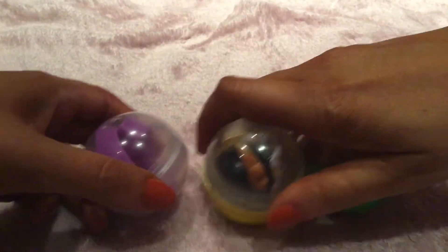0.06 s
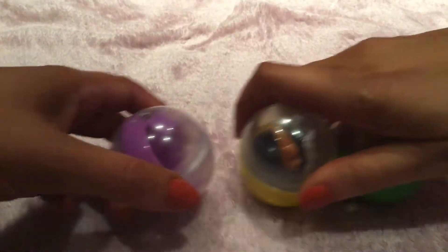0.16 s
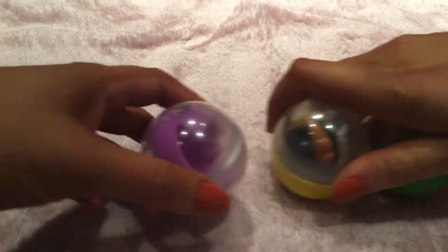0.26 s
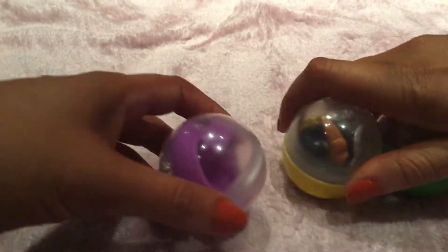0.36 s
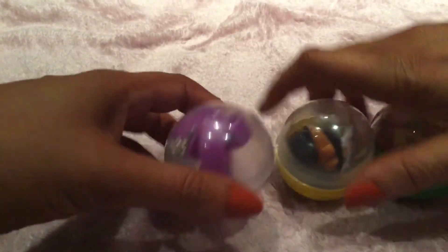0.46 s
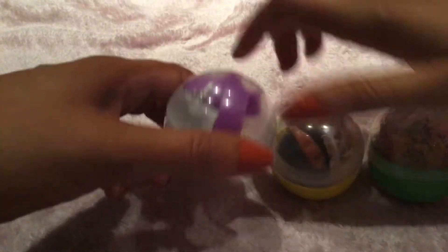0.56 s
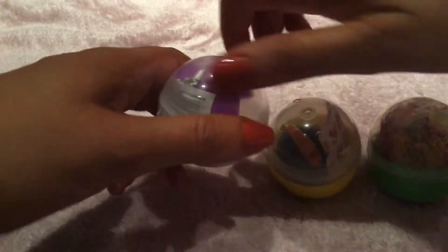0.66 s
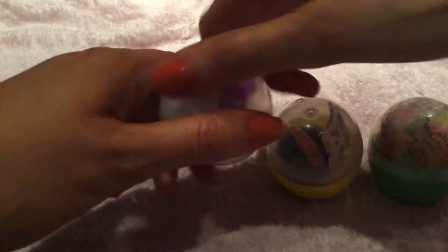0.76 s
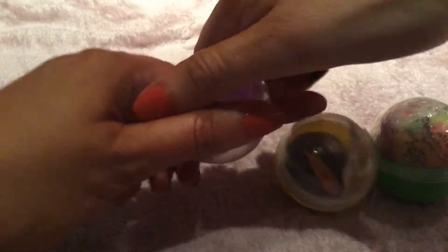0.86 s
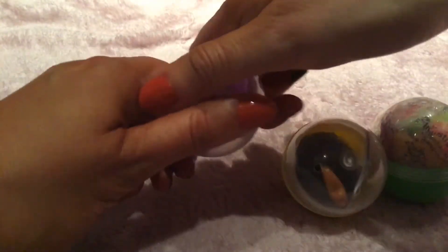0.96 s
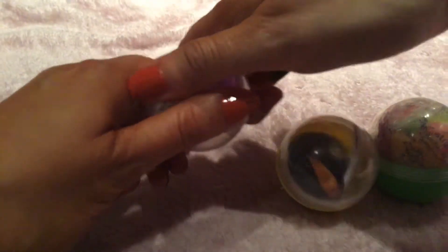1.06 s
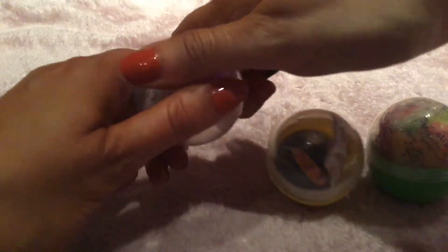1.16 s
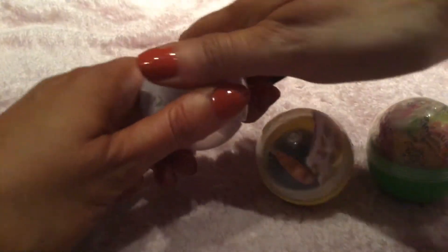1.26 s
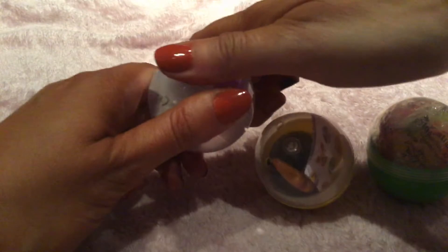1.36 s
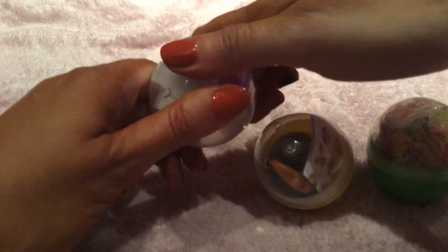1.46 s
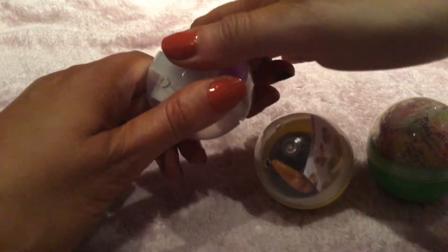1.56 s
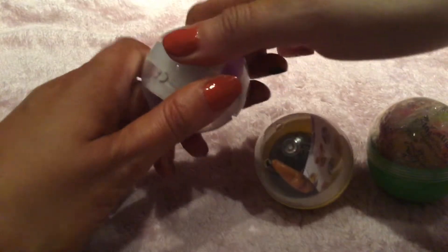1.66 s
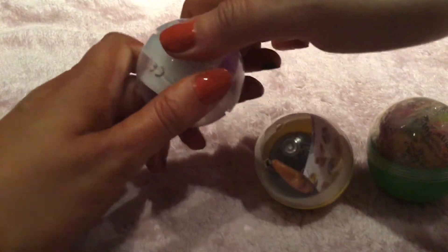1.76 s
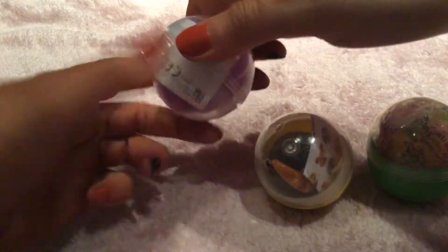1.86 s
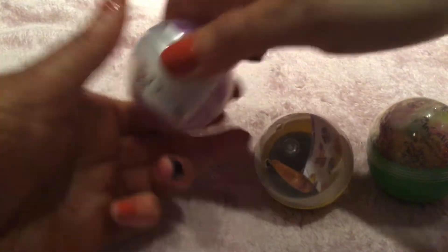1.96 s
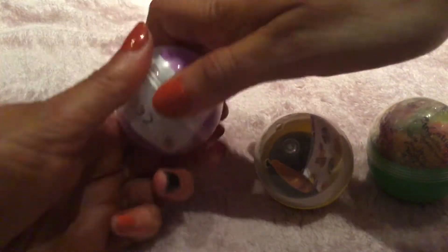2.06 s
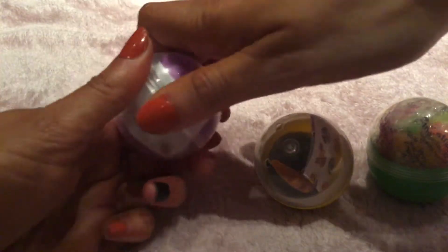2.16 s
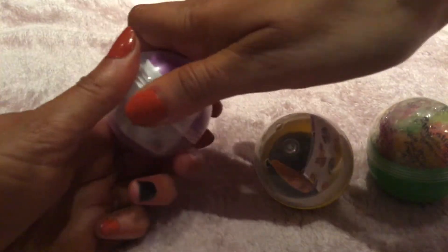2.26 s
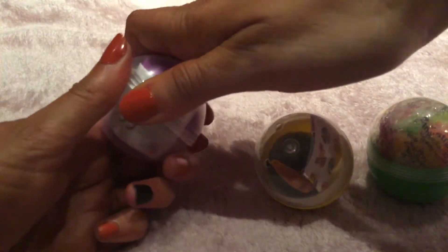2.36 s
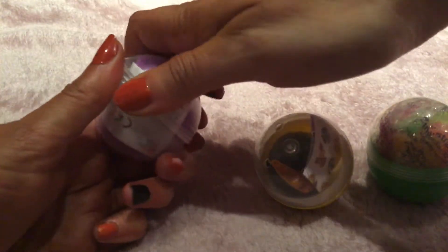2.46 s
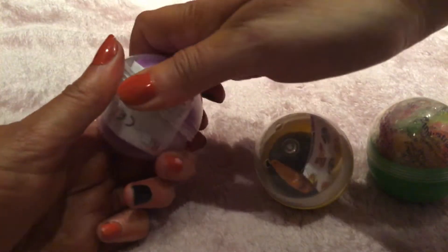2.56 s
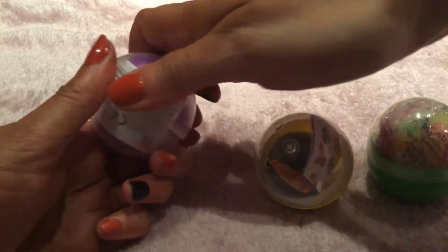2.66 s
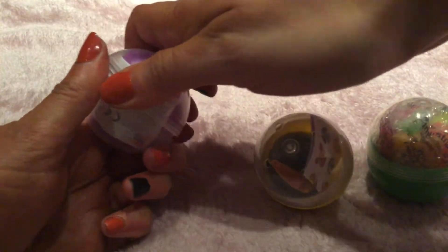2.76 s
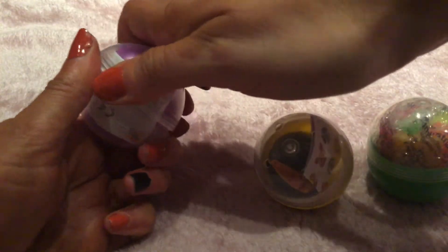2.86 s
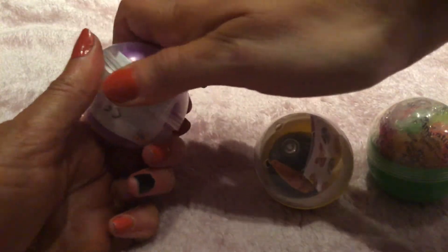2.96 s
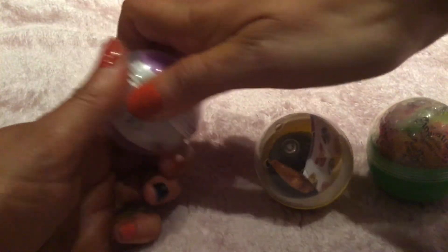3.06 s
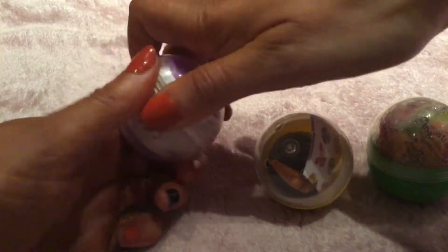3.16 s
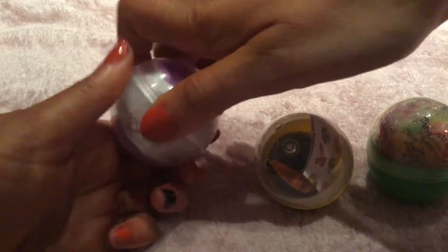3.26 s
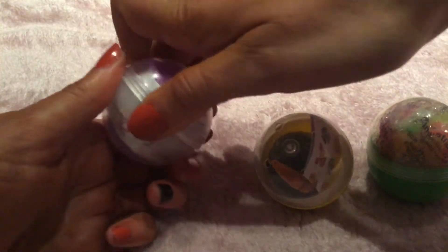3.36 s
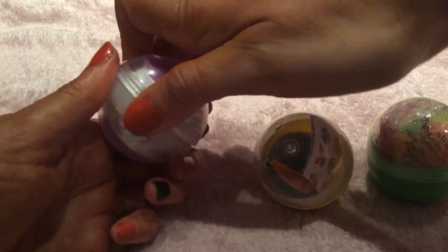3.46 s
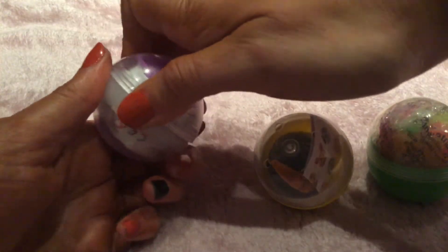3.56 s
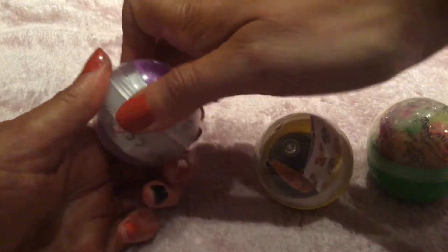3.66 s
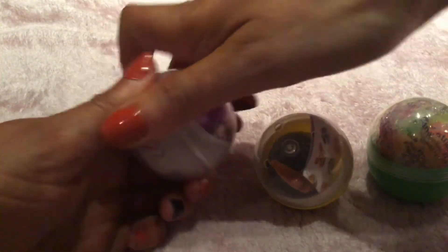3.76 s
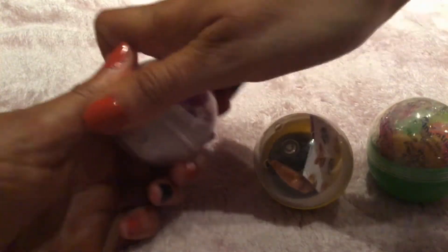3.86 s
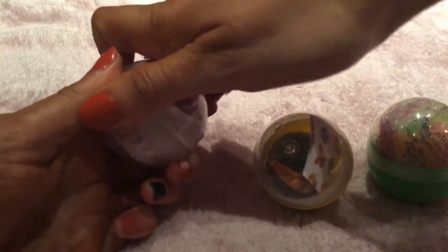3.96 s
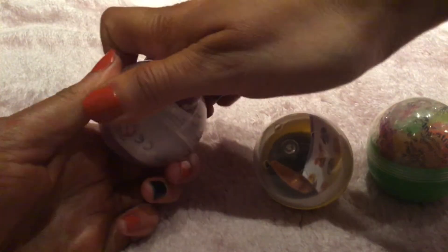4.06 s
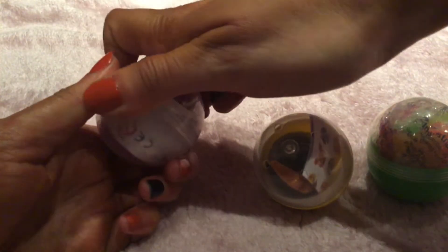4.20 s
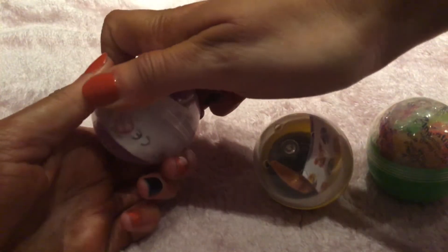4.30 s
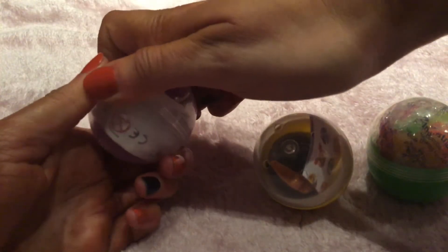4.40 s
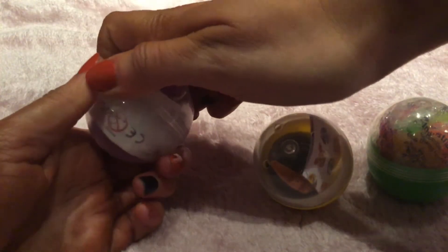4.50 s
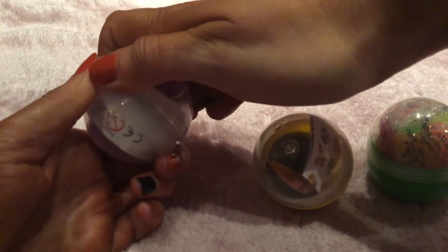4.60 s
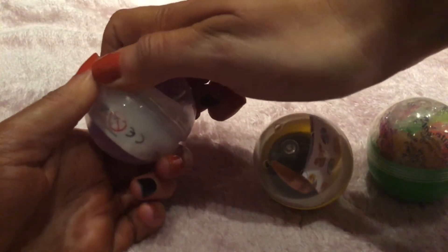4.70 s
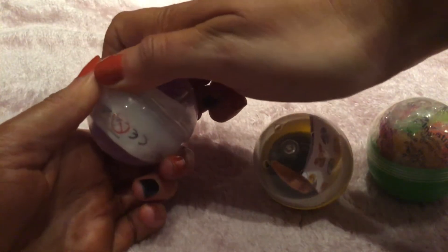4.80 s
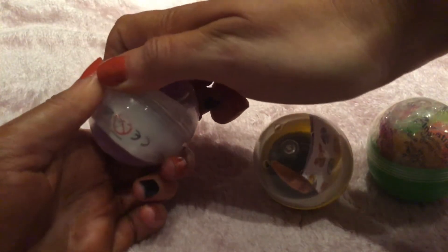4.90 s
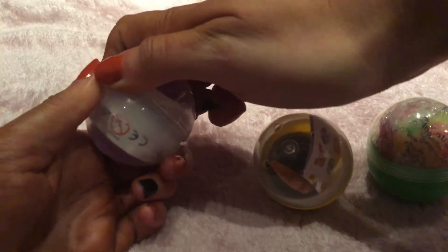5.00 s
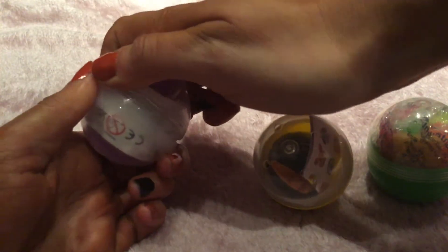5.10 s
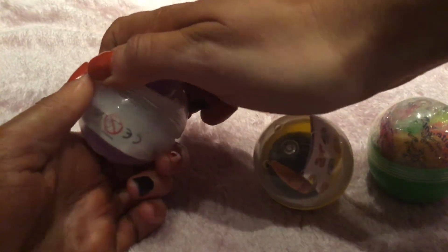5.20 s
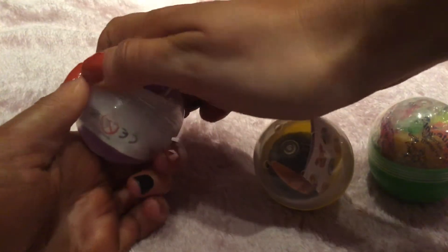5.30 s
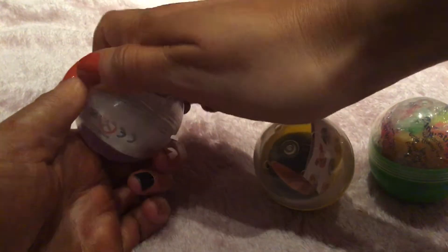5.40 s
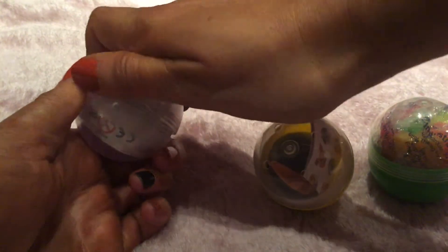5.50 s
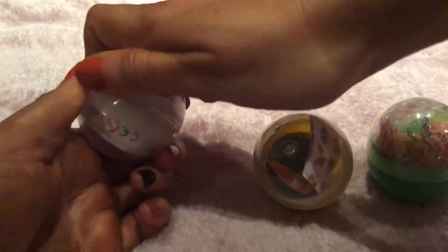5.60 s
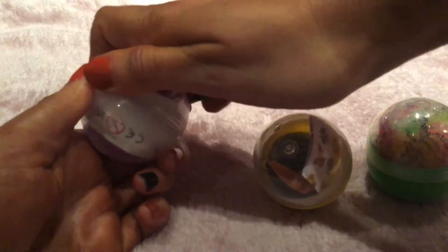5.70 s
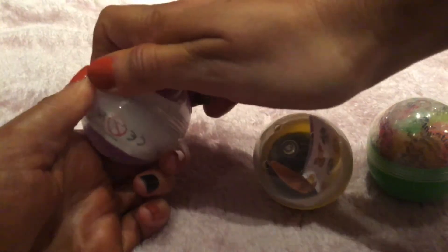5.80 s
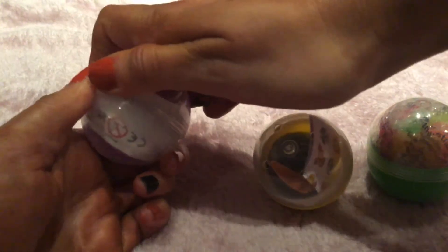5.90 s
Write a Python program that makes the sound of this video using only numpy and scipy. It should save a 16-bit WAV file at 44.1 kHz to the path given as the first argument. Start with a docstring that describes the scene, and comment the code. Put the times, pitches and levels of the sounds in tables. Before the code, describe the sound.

Hard plastic toy capsule handled and pried at, with faint nail ticks, a quick double snap, then one loud sharp crack and a weaker one.

```python
"""A hard plastic toy capsule is pried open: its rim sticks, then slips over its catch with a few sharp snaps.
Each snap is a jolt exciting damped shell modes, with a chirped thump from the wall and a brief knock.
Around the snaps, short filtered clicks are nails ticking, hollow resonances are fingertips bumping,
grainy shaped noise is skin sliding, and dense jolts are the rim creaking and settling.
A short, diffuse reverberation follows, above coloured-noise room rumble, hiss and a faint motor hum."""
import sys
import numpy as np
from scipy import signal
from scipy.fft import rfft, irfft, next_fast_len
from scipy.io import wavfile
from scipy.ndimage import uniform_filter1d

SR = 44100
rng = np.random.default_rng(int(sys.argv[2]) if len(sys.argv) > 2 else 0)


def unload_audio(sound):
    """Save the sound as a 16-bit wav file, at the path given as the first command line argument."""
    columns = np.transpose(np.atleast_2d(sound))
    # keep every value between -1 and 1, then stretch to whole-number steps
    steps = np.round(np.clip(columns, -1, 1) * 32767)
    wavfile.write(sys.argv[1], SR, steps.astype(np.int16))


N = 262130
HIT_SIZE, LEAD_S = 4096, 0.012  # samples in one hit, and the time of contact inside it

# Slips of the rim over its catch: t/s, crack level/dB, slip time constant/ms, slip level re jolt/dB,
# spectral tilt/(dB per octave), first freed f/Hz, its boost/dB, second freed f/Hz, its boost/dB,
# muted f/Hz, crack cutoff f/Hz, knock level/dB, thump level/dB, initial thump f/Hz, thump decay/ms
RIM_SLIPS = [(1.1324, -32.5, .28, -9, -6, 2230, 9, 4200, 7.5, 7000, 12000, -46, -31, 900, 6),
             (1.1459, -18.5, .4, -8, -0.5, 2050, 14.5, 3820, 7, 2994, 12500, -21.5, -15.5, 766, 4.5),
             (1.1561, -35.5, .48, -2, -3, 2760, 10, 1700, 7, 4500, 14000, -40, -32, 594, 3.7),
             (1.1708, -21, 1.06, 3.5, 0.5, 3100, 9, 4310, 7, 3650, 11500, -27, -13.5, 690, 4.5),
             (3.7773, -11, 0.55, -3, -1, 4390, 9.5, 1694, 7, 3100, 12440, -11.5, -8.5, 774, 2.9),
             (4.6106, -24, 0.96, 0.5, -3.5, 2800, 5.5, 7050, 2.5, 2010, 12100, -29, -16.5, 684, 5.2)]


def snaps(low_hz=1450, bare_share=0.3, freed_oct=0.22, muted_oct=0.1, muted_db=-9):
    """Stick-slip release: the rim scrapes up its catch, then one jolt excites the shell and its wall."""
    out = np.zeros(N)
    jolt = signal.unit_impulse(HIT_SIZE, int(LEAD_S * SR))
    for (s, crack_db, slip_ms, slip_db, tilt_db, first_hz, first_db, second_hz, second_db, muted_hz,
         edge_hz, knock_db, thump_db, thump_hz, decay_ms) in RIM_SLIPS:
        force = strength(jolt, 0) + strength(slip(slip_ms), slip_db)
        ring = shell(force, direct=bare_share)

        # The fingers' grip frees two resonances and mutes a third.
        grip_db = first_db * bell(ring, first_hz, freed_oct)
        grip_db += second_db * bell(ring, second_hz, freed_oct)
        grip_db += muted_db * bell(ring, muted_hz, muted_oct)
        slope_db = tilt_db * octaves(ring).clip(10)  # tilted above 1024 Hz only
        ring = irfft(rfft(ring) * undb(slope_db + grip_db))

        ring = butter(ring, edge_hz, "low", order=3)
        crack = disperse(butter(ring, low_hz, "high", order=5))
        spring = thump(thump_hz, decay_ms)
        air = spring + hollow(spring)
        hit = strength(crack, crack_db) + strength(knock(), knock_db) + strength(air, thump_db)
        add(out, hit, s)
    return out


def slip(ms, grain_db=4, release=1.0):
    """Stick-slip friction: tiny random jolts build up and die away; release scales the dying time."""
    t_ms = 1000 * (np.arange(HIT_SIZE) / SR - LEAD_S)
    grains = rng.standard_normal(HIT_SIZE) * undb(grain_db * rng.standard_normal(HIT_SIZE))
    return grains * np.exp(-np.maximum(-t_ms, t_ms / release) / max(ms, 0.1))


# Modes of the hand-damped shell: f/Hz, bandwidth/Hz, level/dB before the random spread
SHELL_MODES = [(1062, 530, 4.5), (1730, 840, -2), (2090, 350, 2), (2530, 330, -3.5), (3100, 420, -3.5),
               (3780, 700, 1.5), (4290, 240, -2), (4650, 210, -5), (5500, 300, -2.5), (5916, 200, -2.5),
               (6920, 240, -11), (8070, 350, -8), (10540, 450, -5), (11320, 600, 0.5), (11900, 500, -7)]


def shell(force, direct=0.3, spread_db=1):
    """Modal superposition: parallel resonances, weighted anew for each contact, plus the bare crack."""
    out = direct * butter(force, 1200, "high")
    for (hz, width_hz, db), chance in zip(SHELL_MODES, rng.standard_normal(len(SHELL_MODES))):
        out = out + undb(db + spread_db * chance) * resonate(force, hz, width_hz)
    return out


def disperse(x, lag_s=0.00017, mid_hz=4000):
    """Bending-wave dispersion: treble outruns bass, smearing a crack into a tiny downward chirp."""
    hz = np.fft.rfftfreq(len(x), 1 / SR)
    # The group delay is lag_s * (sqrt(mid_hz / hz) - 1).
    delay_cycles = lag_s * (2 * np.sqrt(mid_hz * hz) - hz)
    return irfft(rfft(x) * np.exp(-2j * np.pi * delay_cycles))


def thump(hz, decay_ms, cycles=0.77, lag_s=0.00029, top_hz=1000, low_hz=105):
    """Dispersive recoil: slower low-pitched bending waves draw the wall's swing into ever longer lobes."""
    t = np.maximum(np.arange(HIT_SIZE) / SR - LEAD_S - lag_s, 0)
    phase = 2 * np.pi * cycles * np.log1p(t * hz / cycles)  # starts at hz, then falls
    swing = -np.sin(phase) * np.exp(-1000 * t / max(decay_ms, 0.5))
    return butter(butter(swing, top_hz, "low"), low_hz, "high")


# Air in the capsule and the cupped hands: f/Hz, bandwidth/Hz, level re thump/dB
AIR_MODES = [(293, 31, -9), (650, 22, -11)]


def hollow(x):
    """Cavity resonance: the enclosed air rings on at low pitch after a thump."""
    return sum(undb(db) * resonate(x, hz, width_hz) for hz, width_hz, db in AIR_MODES)


def knock(hz=900, length_ms=0.68, lag_s=0.00079):
    """Damped bending mode: the palm confines the dome's lowest mode to a brief Gaussian burst."""
    t = np.arange(HIT_SIZE) / SR - LEAD_S - lag_s
    return -np.cos(2 * np.pi * hz * t) * np.exp(-(1000 * t / length_ms) ** 2 / 2)


def settling(per_s=1400, level_db=-33.5, fade_s=0.025, spread_db=5, rise_s=0.0042, edge_hz=7000):
    """Creep under strain: a dense crackle swells and fades about each snap, in proportion to its crack."""
    strain = sum(undb(crack_db + level_db) * swell(s, rise_s, fade_s) for s, crack_db, *_ in RIM_SLIPS)
    crackle = shell(jolts(per_s, spread_db), direct=1.0)
    return unit(butter(crackle, edge_hz, "low")) * strain


# The strained rim drags: t of letting go/s, shell level/dB, build-up time constant/s
RIM_DRAGS = [(1.116, -51, 0.004), (4.699, -57, 0.028), (5.53, -65, 0.013)]


def creaks(per_s=3000, spread_db=5, stop_s=0.0025, edge_hz=4200, body_db=-7, body_hz=900,
           rim_hz=3850, rim_width_hz=350, rim_db=0):
    """Stick-slip creak: dense jolts swell as the rim drags and sings, then stop when it lets go."""
    force = jolts(per_s, spread_db)
    rim = undb(rim_db) * resonate(force, rim_hz, rim_width_hz)
    ring = butter(shell(force, direct=0.12) + rim, edge_hz, "low", order=6)
    body = butter(butter(force, body_hz, "low"), 440, "high")
    drag = sum(undb(db) * swell(s, rise_s, stop_s) for s, db, rise_s in RIM_DRAGS)
    return (unit(ring) + undb(body_db) * unit(body)) * drag


def jolts(per_s, spread_db):
    """Poisson-like excitation: separate jolts of random sign and uneven size at random moments."""
    present = rng.random(N) < per_s / SR
    sign = np.sign(rng.standard_normal(N))
    return present * sign * undb(spread_db * rng.uniform(-0.81, 1, N))


# Nails and the loose rim on the shell: t/s, ring level/dB, knock level re ring/dB,
# centre of emphasis f/Hz, build-up time constant/ms
CONTACTS = [(.804, -59, 3, 11500, 1.2), (0.8512, -52, -13, 4650, 0.5), (0.902, -63, 5, 1500, 1.7),
            (0.9935, -58, -6, 3850, 0.9), (1.341, -56.5, -11, 3300, .6), (1.357, -49.5, -5, 3500, 8.8),
            (1.454, -57.5, -21, 5140, 0.91), (1.599, -60.5, -17, 10800, .8), (1.677, -58, -16, 4970, 0.86),
            (1.703, -62, -6, 6400, .8), (1.747, -53.5, -20, 8160, 1.6), (1.793, -61.5, -20, 5700, 1.4),
            (1.863, -51, -2.5, 3500, 5), (1.896, -48, 0, 3980, 2.8), (2.033, -57, -27, 11400, 0.46),
            (2.048, -52.5, -20, 5600, 2), (2.0577, -41.5, -26, 11900, 0.92),
            (2.0615, -48, -26, 12500, 0.63), (2.066, -48.5, -16, 8500, 1.3),
            (2.1135, -50.5, -28, 10200, 0.47), (2.1168, -46.5, -28, 8700, .8),
            (2.164, -56.5, -12, 12000, 1.2), (2.169, -58, -7, 3500, 3.5), (3.260, -44.5, 3.5, 5200, 1.35),
            (3.388, -62, -13, 5000, 1.2), (3.510, -49, -11, 7000, 0.29), (3.743, -54, -4.5, 3060, 1.2),
            (3.781, -29.5, -7, 6000, 1.3), (3.7943, -35, -7, 7540, .9), (3.805, -47, -8.5, 11100, 0.99),
            (3.8135, -39.5, -5.5, 10500, 1), (3.8285, -43.5, -6.5, 8500, 0.8),
            (3.8332, -46, -13, 9100, 0.68), (3.8358, -39, -12, 7000, 2.8), (3.871, -56.5, -1, 4500, 1.1),
            (3.924, -53.5, -14.5, 4400, 1.8), (4.192, -53, -3, 2860, 1.4), (4.6147, -49, 5, 6500, 1.8),
            (4.628, -47, -1.5, 2500, 1.05), (4.667, -64, -10, 3700, 0.85), (4.676, -49, -1, 2290, 1.9),
            (4.692, -50.5, -8, 3100, 2.7), (4.696, -45.5, -17, 2880, 2.3), (4.757, -55.5, -1, 3600, 3),
            (4.826, -68, -8, 3800, 1.2), (5.529, -58.5, 7, 3000, 3.2), (5.595, -49.5, -7, 3330, 1.1)]


def ticks():
    """Light impact: nails and the loose rim touch the shell in brief contacts."""
    out = np.zeros(N)
    for s, db, knock_db, hz, ms in CONTACTS:
        add(out, tick(db, knock_db, hz, ms), s)
    return out


def tick(db, knock_db, hz, ms, width_oct=0.82, knock_hz=750, knock_low_hz=300, edge_hz=15000,
         low_share=0.3):
    """Contact stiffness: a harder touch favours higher modes; the flesh behind it adds a dull knock."""
    force = slip(ms, release=0.17)  # stops sooner than it builds up
    ring = butter(shell(force, direct=0.13), edge_hz, "low", order=3)
    ring = butter(ring, low_share * hz, "high", order=5)
    ring = irfft(rfft(ring) * bell(ring, hz, width_oct))
    dull = butter(butter(force, knock_hz, "low"), knock_low_hz, "high")
    return strength(ring, db) + strength(dull, db + knock_db)


# Fingertips on the closed capsule: t/s, level/dB, hollow resonance f/Hz, T60/s
FINGERTIP_BUMPS = [(0.903, -45, 764, 0.025), (.929, -54.5, 640, 0.021), (0.994, -52, 795, 0.027),
                   (2.169, -43.5, 393, 0.057), (3.261, -42, 375, 0.053), (3.26, -40, 88.5, 0.14),
                   (4.698, -44, 480, 0.013), (5.595, -48, 488, .018)]


def bumps(contact_ms=3.3, soft_hz=1100):
    """Soft impact: a long contact has little treble and wakes one low, hollow resonance."""
    out = np.zeros(N)
    for s, db, hz, t60 in FINGERTIP_BUMPS:
        width_hz = np.log(1000) / (np.pi * t60)
        push = butter(slip(contact_ms), soft_hz, "low", order=3)
        add(out, strength(resonate(push, hz, width_hz), db), s)
    return out


# Spectrum of sliding skin: f/Hz, relative density level/dB
SKIN_SPECTRUM = [(700, -8), (1500, -14), (3200, -11.5), (4500, 4.5), (6800, 0.5), (8600, -6.5), (10300, -2),
                 (11800, 2), (13300, -8), (16000, -16)]
# Finger strokes: t of firmest pressure/s, level/dB, swell time constant/s, fade time constant/s,
# spectral tilt/(dB per octave)
FINGER_STROKES = [(.475, -71.5, 0.012, 0.068, -1), (.672, -71.5, 0.008, 0.1, 2),
                  (.8, -66.5, 0.042, 0.057, 11.5), (0.855, -62.5, 0.023, 0.018, -2),
                  (1.26, -72, 0.02, 0.17, -4.5), (1.359, -65, 0.013, 0.015, 0),
                  (1.695, -73, 0.034, 0.025, 12), (1.852, -57, 0.012, 0.021, -3),
                  (1.885, -70, 0.012, 0.009, 5), (1.965, -70.5, 0.035, 0.05, 9),
                  (2.07, -72.5, 0.054, 0.11, -4), (2.88, -76, 0.17, 0.12, -14),
                  (3.15, -65.5, 0.052, 0.029, -1), (3.31, -66.5, 0.043, 0.029, -2.5),
                  (3.61, -72, 0.032, .03, -2), (3.97, -71.5, 0.043, 0.12, -4),
                  (4.47, -71.5, 0.035, 0.05, -14.5)]


def fingers(grain_db=4.5, flutter_db=1.5, ridge_db=1.5, body_db=-11):
    """Sliding friction: skin ridges catch and slip in a grainy hiss that also stirs the shell."""
    uneven_db = grain_db * rng.standard_normal(N) + flutter_db * walk(94) + ridge_db * walk(600)
    grains = rng.standard_normal(N) * undb(uneven_db)
    rub = unit(colour(grains, SKIN_SPECTRUM)) + undb(body_db) * unit(shell(grains, direct=0.16))
    rub = np.resize(rub, next_fast_len(N))
    spectrum = rfft(rub)
    height_oct = octaves(rub).clip(np.log2(3000))  # tilted above 3 kHz only
    out = np.zeros(N)
    for s, db, rise_s, fall_s, tilt_db in FINGER_STROKES:
        hiss = unit(irfft(spectrum * undb(tilt_db * height_oct))[:N])
        out += undb(db) * swell(s, rise_s, fall_s) * hiss
    return out


# Reverberation by band: centre f/Hz, level/dB, T60/s
REVERB_BANDS = [(177.6, -14, 0.24), (445, -18.5, 0.092), (900, -20, 0.15), (1650, -22, 0.15),
                (3036, -24, 0.27), (4877, -19.5, 0.17), (7600, -10.5, 0.06), (12080, -21, .18)]


def reverberation(x, gap_s=0.00093):
    """Diffuse decay: a small furnished room answers with noise bands that each fade exponentially."""
    t = np.arange(SR // 2) / SR
    centres = np.log2([row[0] for row in REVERB_BANDS])
    response = np.zeros(len(t))
    for (hz, db, t60), share in zip(REVERB_BANDS, np.eye(len(REVERB_BANDS))):
        weight = np.sqrt(np.interp(octaves(t), centres, share))  # crossfades neighbouring bands
        band = irfft(rfft(rng.standard_normal(len(t))) * weight, len(t))
        fade = np.exp(-np.log(1000) * t / t60) * (t > gap_s)
        response += undb(db) * band * fade / np.sqrt(np.sum(fade ** 2))
    return signal.fftconvolve(x, response)[:N]


# Room rumble and microphone hiss, before the low cut: f/Hz, relative density level/dB
ROOM_SPECTRUM = [(15, -42), (25, -14), (38, -8.5), (97, -7), (149, -6), (166, -6.5), (195, -4), (217, -7),
                 (335, -9.5), (400, -15.5), (480, -23), (714, -26), (911, -28.5), (2610, -35.3),
                 (5000, -38.3), (9000, -42.7), (11200, -40.5), (13000, -47.5), (16000, -59.5)]


def background(room_db=-58.5, wander_db=-0.5, low_hz=48, hum_hz=48.5, harmonics_db=(-73, -77, -81, -65.5),
               waver_db=2.0, drift=0.0037):
    """Stationary noise and harmonic hum: coloured rumble and hiss above a house motor's wavering tones."""
    rumble = butter(colour(rng.standard_normal(N), ROOM_SPECTRUM), low_hz, "high", order=5)
    turns = np.cumsum(hum_hz * (1 + drift * walk(1.9))) / SR
    hum = np.zeros(N)
    for number, db in enumerate(harmonics_db, start=1):
        tone = np.sqrt(2) * np.sin(2 * np.pi * number * turns)
        hum += tone * undb(db + waver_db * walk(3.6))
    return unit(rumble) * undb(room_db + wander_db * walk(2.1)) + hum


def undb(db):
    """Logarithmic level: convert decibels to amplitude gain."""
    return 10 ** (np.asarray(db) / 20)


def unit(x):
    """Normalisation: scale to an rms of one."""
    return x / np.sqrt(np.mean(x ** 2))


def strength(x, db):
    """Energy equivalence: give a click the energy of one millisecond at this rms level."""
    return x * undb(db) / np.sqrt(np.sum(x ** 2) / (SR / 1000))


def butter(x, hz, kind, order=2):
    """Maximally flat filtering: a causal low-pass or high-pass."""
    return signal.sosfilt(signal.butter(order, min(hz, SR / 2 - 100), kind, fs=SR, output="sos"), x)


def resonate(x, hz, width_hz):
    """Simple resonance: a second-order peak of the given bandwidth."""
    return signal.lfilter(*signal.iirpeak(hz, hz / width_hz, fs=SR), x)


def octaves(x):
    """Logarithmic pitch: the frequency of each spectral bin of x, in octaves above 1 Hz."""
    return np.log2(np.maximum(np.fft.rfftfreq(len(x), 1 / SR), 1))


def bell(x, hz, width_oct):
    """Resonance weighting: a bell over the spectrum of x, one at its centre."""
    return 1 / (1 + ((octaves(x) - np.log2(hz)) / width_oct) ** 2)


def colour(x, points):
    """Spectral shaping: interpolate levels between (f/Hz, level/dB) points on a logarithmic axis."""
    hz, db = np.transpose(points)
    return irfft(rfft(x) * undb(np.interp(octaves(x), np.log2(hz), db)), len(x))


def walk(rate):
    """Band-limited fluctuation: smoothed random steps, rate per second, with an rms of one."""
    k = int(SR / rate)
    steps = np.repeat(rng.standard_normal(N // k + 1), k)[:N]
    return unit(uniform_filter1d(steps, k))


def swell(s, rise_s, fall_s):
    """Exponential envelope: grows to one at s seconds and dies away."""
    t = np.arange(N) / SR - s
    return np.exp(-np.maximum(-t / max(rise_s, 0.001), t / max(fall_s, 0.001)))


def add(out, x, s):
    """Superposition: mix a hit into out with its contact at s seconds."""
    i = int((s - LEAD_S) * SR)
    out[i:i + len(x)] += x[:N - i]


def scene():
    """Superposition of the capsule and hands, their reverberation and the background."""
    handling = snaps() + settling() + creaks() + ticks() + bumps() + fingers()
    return (handling + reverberation(handling) + background())[None]


def record(dry, top_hz=16200):
    """Band limitation: a steep elliptic low-pass in the recorder cuts the top."""
    return signal.sosfilt(signal.ellip(8, 0.2, 70, top_hz, fs=SR, output="sos"), dry)


dry = scene()
out = record(dry)
unload_audio(out)
```